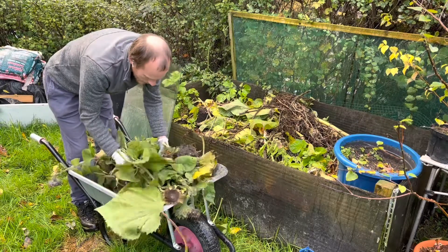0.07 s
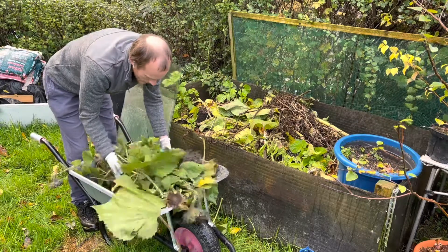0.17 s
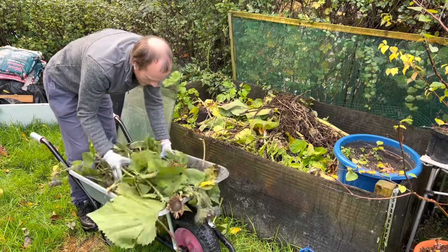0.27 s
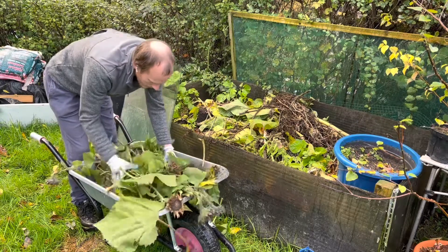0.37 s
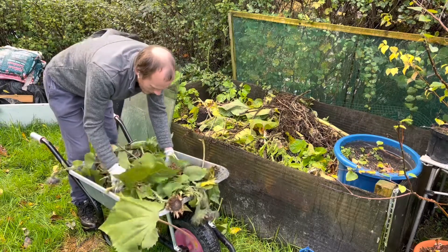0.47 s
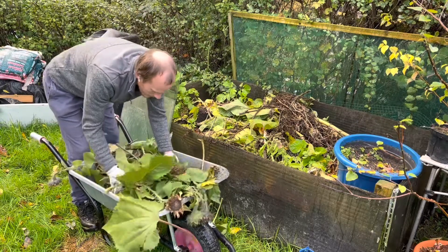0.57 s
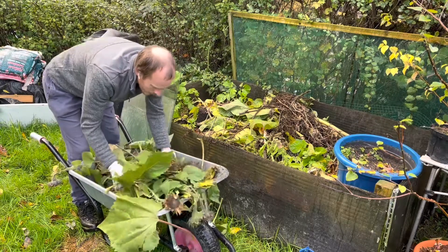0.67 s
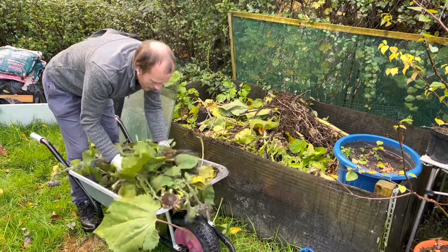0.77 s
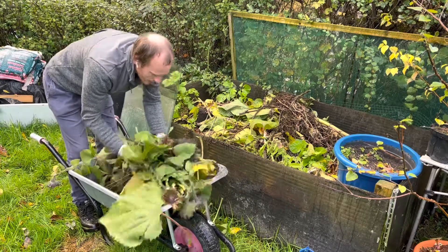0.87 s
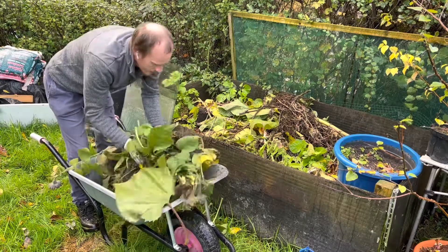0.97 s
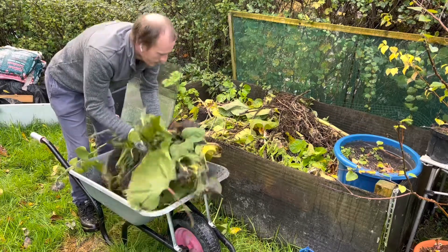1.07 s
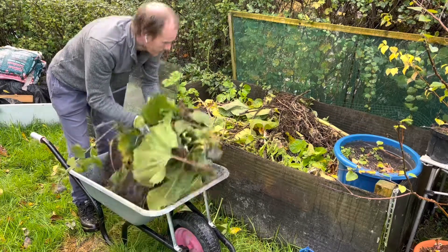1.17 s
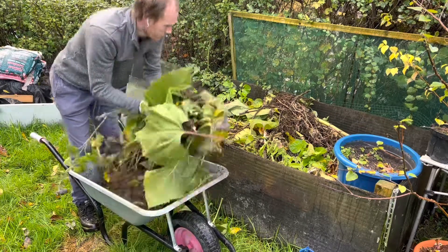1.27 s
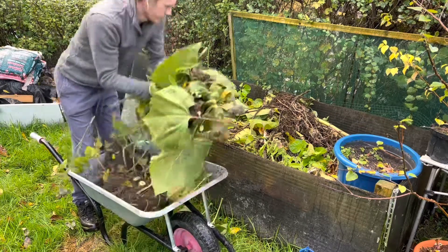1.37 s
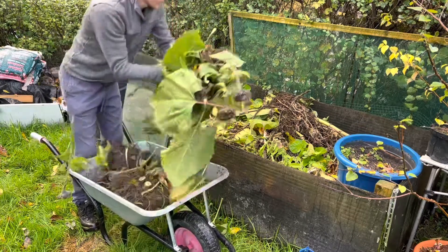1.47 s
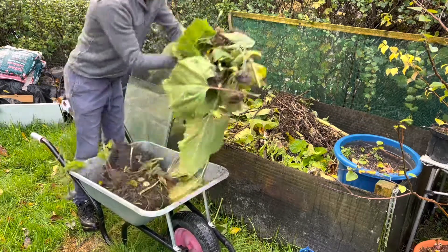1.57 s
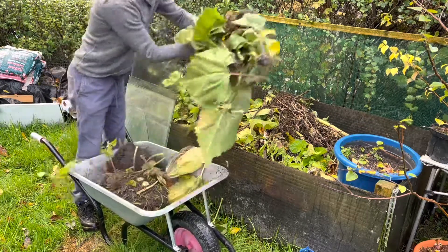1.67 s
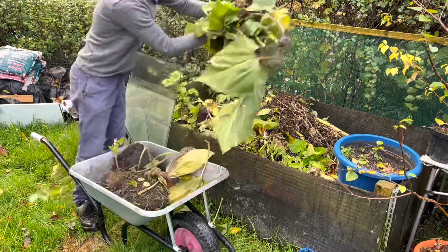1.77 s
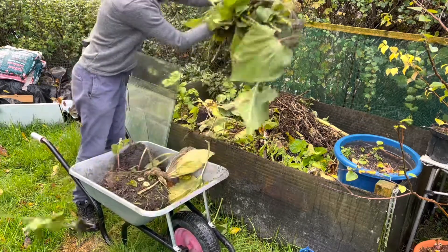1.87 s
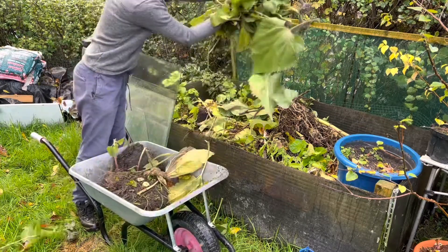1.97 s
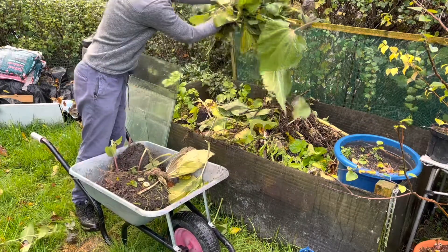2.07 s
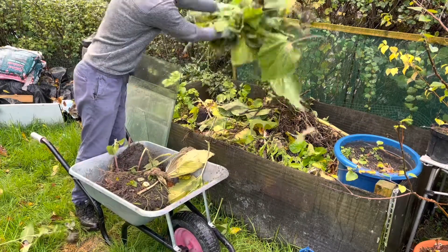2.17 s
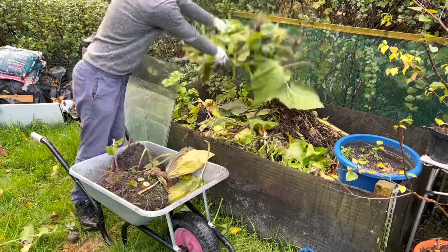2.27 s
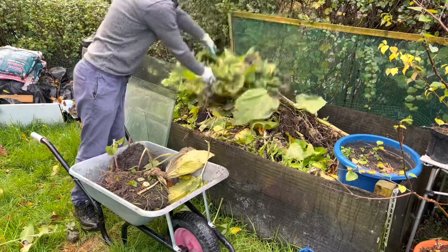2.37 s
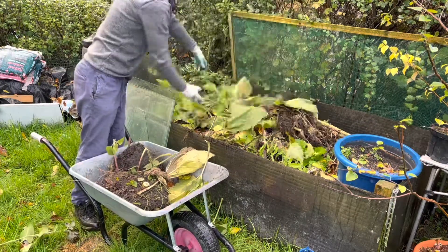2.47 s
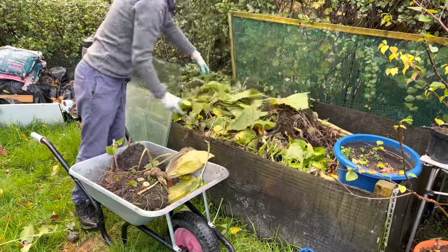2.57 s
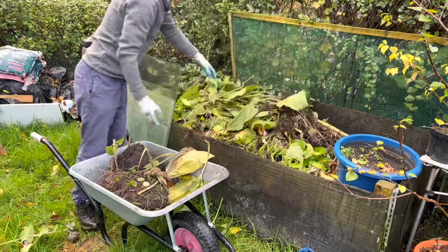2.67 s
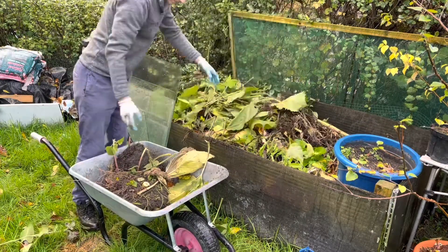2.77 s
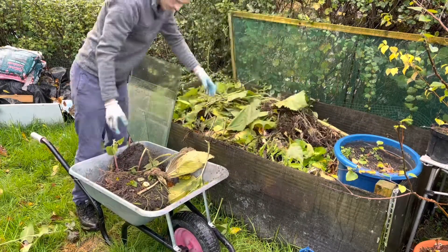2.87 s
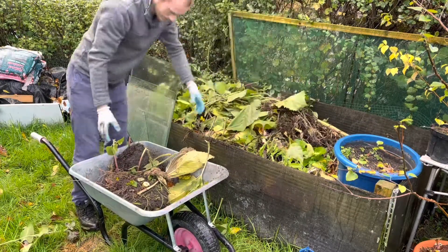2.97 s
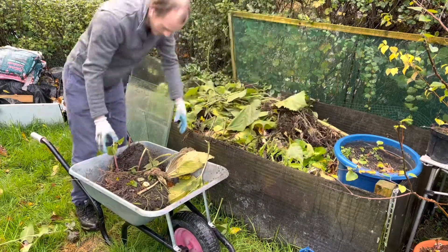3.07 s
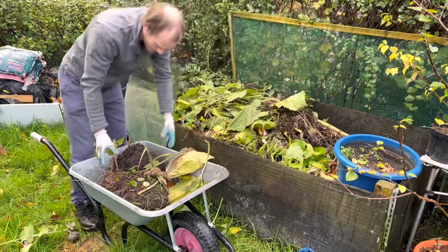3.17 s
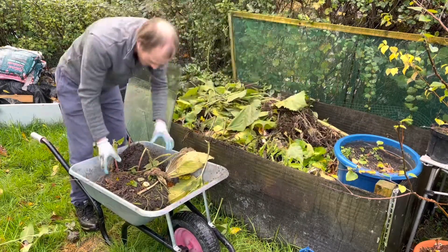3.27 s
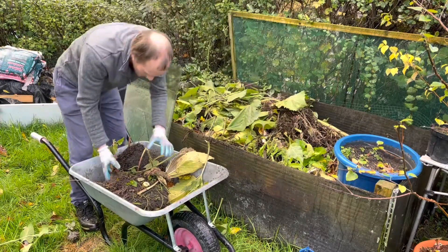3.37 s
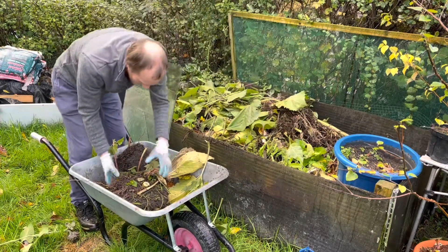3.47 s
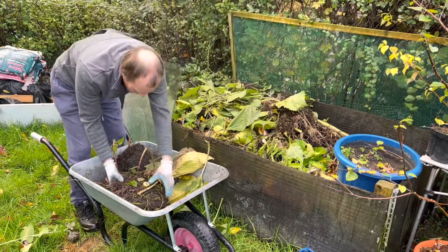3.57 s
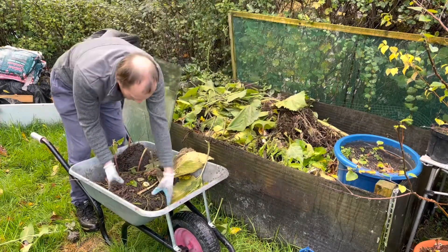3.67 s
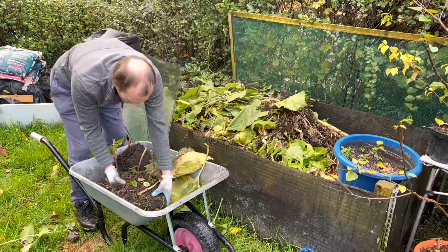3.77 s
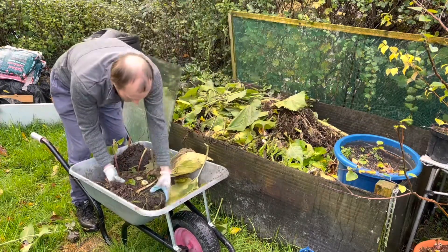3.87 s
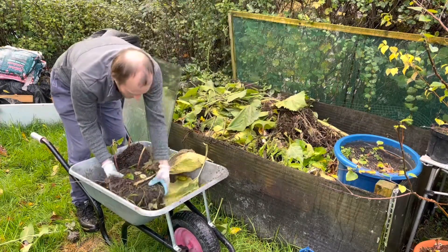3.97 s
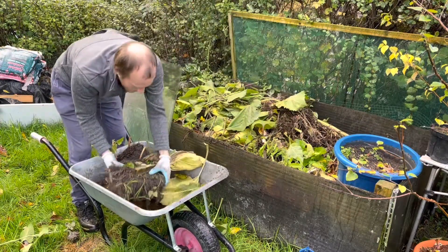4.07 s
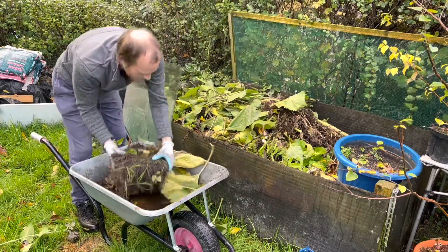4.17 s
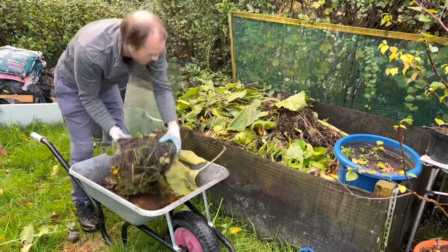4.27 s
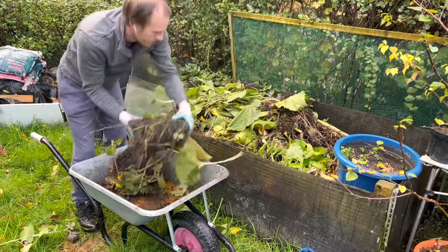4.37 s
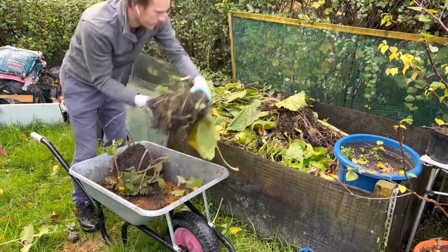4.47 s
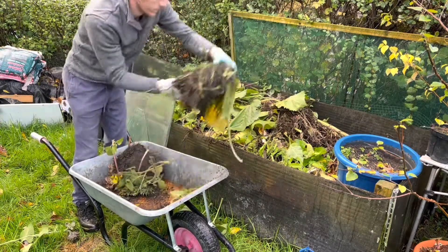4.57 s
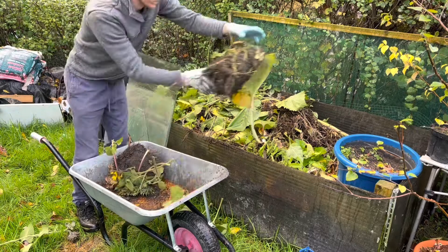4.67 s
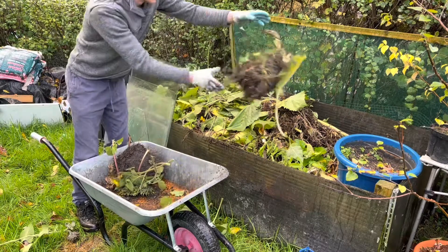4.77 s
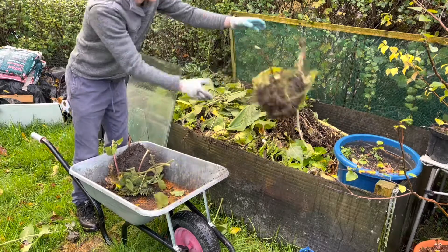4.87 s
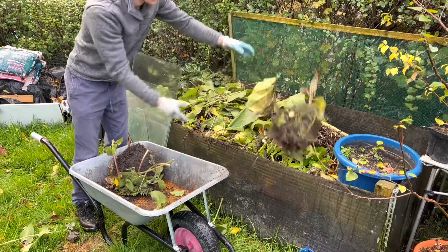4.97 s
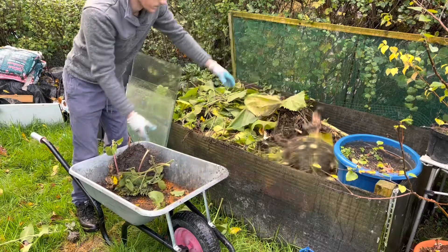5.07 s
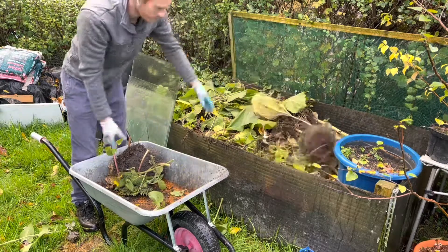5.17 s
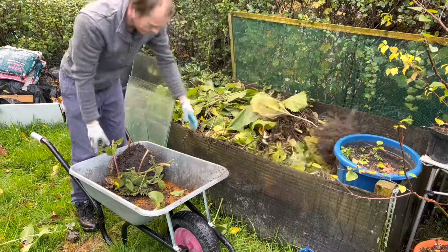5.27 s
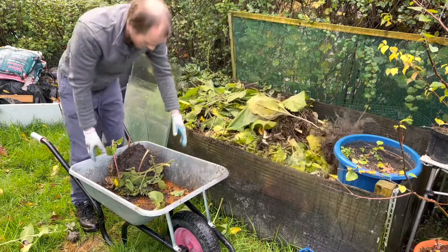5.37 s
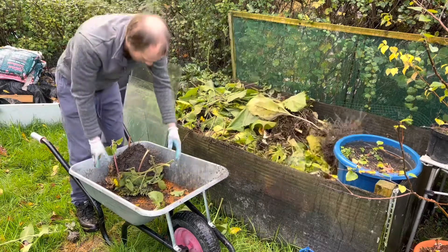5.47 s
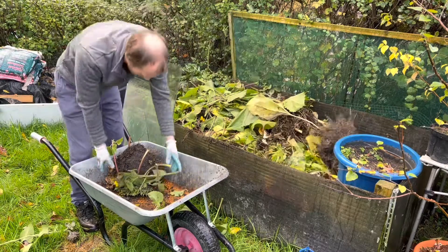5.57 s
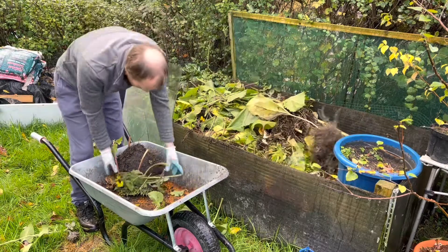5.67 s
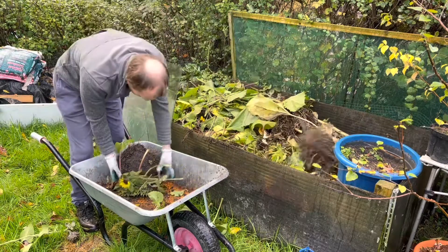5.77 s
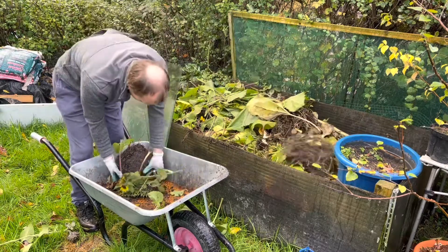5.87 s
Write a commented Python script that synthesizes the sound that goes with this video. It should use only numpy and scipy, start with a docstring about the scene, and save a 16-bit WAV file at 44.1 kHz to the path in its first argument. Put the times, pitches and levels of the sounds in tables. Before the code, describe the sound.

In a quiet garden, gloved hands gather big leaves from a metal wheelbarrow with a crinkling rustle and snapping stems. A clod drops back with a loud crunch and briefly rings the tray. The leaves land rustling on a compost heap and a small bird chirps once, faintly. Then soil and dry roots are scraped up and thrown, crackling more softly among dull thuds. Everything is heard from straight ahead.

```python
"""In a quiet garden, gloved hands gather an armful of big leaves from a metal wheelbarrow.
A clod drops back and rings the tray. The leaves are tossed on a compost heap, a small bird chirps,
then soil and roots are scooped up and thrown after them. The rustle is a shower of tiny slips and
breaks; single stems snap and lumps of earth thud."""
import sys
import numpy as np
from scipy import signal
from scipy.fft import rfft, irfft, next_fast_len
from scipy.io import wavfile

SR = 44100
rng = np.random.default_rng(int(sys.argv[2]) if len(sys.argv) > 2 else 0)


def unload_audio(sound):
    """Save the sound as a 16-bit wav file, at the path given as the first command line argument."""
    columns = np.transpose(np.atleast_2d(sound))
    # keep every value between -1 and 1, then stretch to whole-number steps
    steps = np.round(np.clip(columns, -1, 1) * 32767)
    wavfile.write(sys.argv[1], SR, steps.astype(np.int16))


N = 261513

# earth landing in the tray (time [s], level [dB], time to fade by 60 dB [s])
CLOD_HITS = [(1.443, -21.5, 0.21), (1.449, -9, 0.11), (1.466, -11.5, 0.15), (1.524, -21, 0.16),
             (1.565, -35, 0.34)]


def undb(db):
    """Turn decibels into a number to multiply by."""
    return 10 ** (np.asarray(db) / 20)


def unit(x):
    """Scale a sound to an average strength (rms) of 1."""
    return x / np.sqrt(np.mean(x ** 2))


def add(out, s, sound):
    """Mix a sound in, starting at s seconds."""
    i = int(s * SR)
    out[i:i + len(sound)] += sound[:N - i]


def band(x, lo_hz, hi_hz, order=2):
    """Keep the pitches between two edges; a higher order cuts more sharply."""
    edges = [lo_hz, min(hi_hz, SR / 2 - SR / 20)]
    return signal.sosfilt(signal.butter(order, edges, "band", fs=SR, output="sos"), x)


def colour(x, points, size=4096):
    """Shape the tone of a sound to follow a curve of (pitch [Hz], level [dB]) points."""
    hz, db = np.transpose(points)
    log_gain = np.log(undb(np.interp(np.log(np.fft.rfftfreq(size, 1 / SR) + 1), np.log(hz), db)))
    cepstrum = irfft(log_gain)[:size // 2]
    cepstrum[1:] *= 2  # makes the filter ring after a click, never before it
    return signal.fftconvolve(x, irfft(np.exp(rfft(cepstrum, size))))[:len(x)]


def wander(rate, size=N):
    """A random drift of about 1 up or down, turning rate times a second."""
    knots = rng.standard_normal(size // 50)
    return np.sqrt(3 / 2) * np.interp(np.arange(size) / SR * rate, np.arange(len(knots)), knots)


def slips(per_s, spread_db, grit_s):
    """A shower of tiny clicks, most weak and a few strong, each trailing a moment of rubbing noise."""
    strength = undb(spread_db * np.minimum(rng.exponential(size=N), 4.5))
    clicks = (rng.random(N) < per_s / SR) * strength * rng.choice([-1, 1], N)
    energy = signal.lfilter([1], [1, -np.exp(-1 / (grit_s * SR))], clicks ** 2)
    return unit(clicks) + .8 * unit(np.sqrt(energy) * rng.standard_normal(N))


def shifting(x, rate, patchy_db):
    """Ever different leaves and crumbs are in play, so each half octave swells and fades by itself."""
    size = next_fast_len(N)
    spectrum = rfft(x, size)
    half_octave = 2 * np.log2(np.fft.rfftfreq(size, 1 / SR).clip(256, 11585))
    bands = (irfft(spectrum * np.maximum(1 - abs(half_octave - k), 0), size)[:N] for k in range(16, 28))
    return sum(part * undb(patchy_db * wander(rate)) for part in bands)


def cracks(per_s, spread_db, cycles):
    """Veins and twigs break one by one, each with a brief ping at a pitch of its own."""
    out, t = np.zeros(N), np.arange(SR // 50) / SR
    for when, pitch, size, phase in rng.random((int(per_s * N / SR), 4)):
        hz = 1200 * 2 ** (2.9 * pitch)
        ping = np.sin(2 * np.pi * (hz * t + phase)) * np.exp(-t * hz / cycles) * np.sqrt(hz)
        strength = undb(spread_db * min(-np.log(1 - size), 3.5))
        add(out, when * N / SR, strength * ping)
    return unit(out)


def crinkle(per_s, spread_db, crack_db, bunch_db, patchy_db):
    """Plants rub against each other: slips and cracks that come in quick bunches."""
    rubbing = shifting(unit(slips(per_s, spread_db, grit_s=0.0036)), rate=45, patchy_db=patchy_db)
    breaks = undb(crack_db) * cracks(per_s=300, spread_db=1.5, cycles=32)
    return undb(bunch_db * wander(120)) * (rubbing + breaks)


def rustle(strokes, plants, earth):
    """Each hand stroke swells, holds and dies away: plants crinkle while crumbs tumble beneath them."""
    t = np.arange(N) / SR
    power = np.zeros((4, N))
    for s, rise, hold, fade, db, body_db, fizz_db, earth_db in strokes:
        # the fall steepens as the last leaves come to rest
        fall_db = -60 * np.clip((t - s - rise - hold) / fade, 0, 2) ** 1.258
        effort = np.clip((t - s) / rise, 0, 1) * undb(fall_db)
        gains = undb(db + np.array([body_db, 0, fizz_db, earth_db]))
        power += np.outer(gains ** 2, effort ** 2)
    body = unit(band(plants, 400, 1160, order=4))  # broad blades
    crackle = unit(band(plants, 1100, 3474, order=5))  # stems
    fizz = unit(band(plants, 3474, 11000, order=5))  # dry edges and grit
    return np.sum(np.sqrt(power) * [body, crackle, fizz, earth], axis=0)


def green_leaves(earth):
    """Big leaves rub and crack as they are gripped, lifted, carried and dropped."""
    # hand strokes (start [s], rise [s], hold [s], fade [s], crackle level [dB],
    # body [dB], fizz [dB], earth [dB]); the last three count from the crackle level
    strokes = [(-0.01, 0.0093, 0.34, 0.57, -38, -4, -1.5, -10),
               (0.39, 0.029, .19, 0.42, -36, -5.5, 0.5, -13),
               (0.56, 0.18, 0.22, 0.43, -32, -4.5, -0.5, -13.5),
               (1.025, 0.077, 0.044, 0.49, -28, -8, -0.5, -19),
               (1.195, 0.016, 0.089, .18, -35.5, -1.5, -2, -0.5),
               (1.325, .055, 0.0092, 0.11, -39.5, 0, -1, 3),
               (1.66, 0.016, 0.097, 1.64, -65.5, -3.5, -1, -6.5),
               (2.10, 0.1005, 0.043, 0.18, -63.5, -5.5, -2, -12),
               (2.218, 0.031, 0.073, .25, -42, -19, -5, -33.5),
               (2.27, 0.047, 0.0078, 0.46, -37.5, -14, 0, -40.5),
               (2.413, 0.026, 0.088, 0.24, -36, -6.5, -1, -3.5),
               (2.39, 0.1, 0.032, 0.32, -28.5, -7, 0, -30),
               (2.625, 0.031, 0.0064, .07, -42.5, -6, 2.5, -12), (2.70, 0.021, .1, .8, -80, 1, -6, -3)]
    # tone of green leaves (pitch [Hz], relative level [dB])
    tone = [(180, -35.5), (300, -3), (412, 2.5), (458, -7), (701, -2), (1190, -8.5), (2080, -3), (3710, -4),
            (4650, -8), (5930, -5), (6590, -7.5), (9770, -17), (11200, -28), (14600, -64.5), (22000, -120)]
    leaves = crinkle(per_s=5500, spread_db=1.5, crack_db=-10.5, bunch_db=0.76, patchy_db=1.8)
    return rustle(strokes, colour(leaves, tone), earth)


def crumbs():
    """Tumbling earth: boxy in the loaded tray, looser and deeper once the clod has landed."""
    # tone of crumbs in the loaded tray (pitch [Hz], relative level [dB])
    tray_tone = [(30, -44.5), (110, -39), (190, -33.5), (250, -31.5), (310, 1), (400, -7.5), (480, -10),
                 (800, -57.5)]
    # tone of loose earth (pitch [Hz], relative level [dB])
    loose_tone = [(30, -30.5), (70, -21.5), (115, -20), (170, -8.5), (230, 2.5), (300, 0), (390, 0.5),
                  (480, -10), (800, -54)]
    tumble = slips(per_s=1100, spread_db=1.8, grit_s=0.0031)
    loaded = np.arange(N) / SR < CLOD_HITS[-1][0]
    return np.where(loaded, unit(colour(tumble, tray_tone)), unit(colour(tumble, loose_tone)))


def garden_air(level_db):
    """Faint outdoor air that swells a little."""
    # tone of still air (pitch [Hz], relative level [dB])
    tone = [(30, -28.5), (110, -12.5), (230, 0.5), (900, -2), (2500, -7), (6000, -9.5), (11000, -22)]
    return undb(level_db + wander(4.2)) * unit(colour(rng.standard_normal(N), tone))


def bursts(table, rise_s, fringe_db):
    """Quickly dying puffs of noise, each around its own pitch with a weaker, wider fringe."""
    out, t = np.zeros(N), np.arange(SR // 4) / SR
    for s, db, hz, octaves, fade_s in table:
        noise = rng.standard_normal(2 * len(t))
        edge = 2 ** (octaves / 2)
        fade = (1 - np.exp(-t / rise_s)) * 1000 ** (-t / fade_s)  # 60 dB down after fade_s
        core = unit(band(noise, hz / edge, hz * edge, order=3))
        fringe = unit(band(noise, hz / edge / 2, hz * edge * 2))
        puff = (core + undb(fringe_db) * fringe)[len(t):] * fade
        add(out, s, undb(db) * puff * np.linalg.norm(fade) / np.linalg.norm(puff))
    return out


def thuds():
    """Earth, hands and boots knock dully: heavy lumps last longer, broad scuffs die sooner."""
    # knocks (time [s], level [dB], pitch [Hz], width [octaves])
    knocks = [(0.25, -30, 348, 0.36), (1.268, -30, 397, 0.31), (1.505, -26.5, 340.5, 0.25),
              (2.975, -39, 337, 1.47), (3.474, -43.5, 380, 0.85), (3.81, -42.5, 227.4, 0.3),
              (3.91, -39, 188, 0.77), (4.213, -30, 271, 0.13), (4.524, -40.5, 260, 0.57),
              (4.59, -43, 260, .22), (4.84, -38.5, 250, 0.16), (5.276, -47.5, 236, 0.74),
              (5.407, -51, 345, 0.63), (5.726, -33, 209, 0.25), (5.867, -34, 199, 0.35)]
    with_fades = [(s, db, hz, octaves, 35 / (hz * (1 + octaves))) for s, db, hz, octaves in knocks]
    return bursts(with_fades, rise_s=.004, fringe_db=-26)


def snaps():
    """Stems snap, leaves and grit flick; they are too thin to give off bass."""
    # snaps and flicks (time [s], level [dB], pitch [Hz], width [octaves], fade [s])
    breaks = [(.7773, -8, 6450, 0.67, 0.0043), (1.0418, -25, 1900, 3, 0.15), (1.205, -22, 2210, 2.2, 0.036),
              (1.296, -27.5, 2000, 2.7, 0.037), (1.384, -32, 4500, 1.9, 0.075),
              (1.475, -49, 7400, 0.95, 0.24), (1.566, -39.5, 7700, 0.67, 0.14),
              (1.618, -32.5, 2730, 0.25, 0.073), (1.651, -23.5, 1670, 0.89, 0.054),
              (1.674, -41.5, 1336, 0.77, 0.11), (2.1358, -54.5, 974, 1.04, 0.047),
              (2.229, -42.5, 2020, 0.33, 0.13), (2.640, -33.5, 627, 1, 0.062),
              (2.642, -29, 2870, 0.65, 0.048), (2.6635, -27, 3160, 0.82, 0.059),
              (3.380, -54.5, 5860, 0.69, 0.035), (3.444, -55, 8960, 0.62, 0.022),
              (4.185, -34.5, 2400, 3.5, 0.055), (4.2117, -28, 1960, 2.9, 0.039),
              (4.569, -40, 2170, 3.44, 0.07), (4.6335, -39.5, 1370, 2.9, 0.094),
              (4.831, -37, 855, 1.6, 0.13), (4.8748, -29.5, 5700, 1.1, 0.08),
              (4.896, -31, 2700, 2.2, 0.048), (5.020, -24, 3110, 0.28, 0.051),
              (5.0892, -35, 2780, 1.8, .015), (5.1018, -27, 3660, 0.57, 0.02),
              (5.287, -43.5, 1870, 1.9, .05), (5.372, -52, 1860, 1.2, 0.083),
              (5.430, -56.5, 1840, 0.7, .06), (5.624, -47, 750, 0.4, 0.1), (5.781, -33.5, 2800, 1.7, 0.063)]
    return band(bursts(breaks, rise_s=.0003, fringe_db=-16) + 1e-18, 200, 17000)


def clod():
    """A clod breaks up on the tray in a few quick crunches."""
    # tone of a crunch (pitch [Hz], relative level [dB])
    tone = [(40, -50), (170, -42.5), (250, -26.5), (340, 3), (600, 3.5), (950, 6.5), (1400, -1.5),
            (2000, -2.5), (2800, -4.5), (3900, -14), (5300, -22), (9000, -34), (11000, -44.5)]
    out, t = np.zeros(N), np.arange(SR // 2) / SR
    for s, db, fade_s in CLOD_HITS:
        crunch = unit(colour(rng.standard_normal(len(t)), tone))
        add(out, s, undb(db) * crunch * (1 - np.exp(-t / 0.002187)) * 1000 ** (-t / fade_s))
    return out


def tray_ring(s, boost_db, fade_s, smother_s, waver_db):
    """The struck steel rings, high notes dying first, until the settling soil smothers it."""
    # the steel tray's own notes (pitch [Hz], relative level [dB])
    notes = [(349.9, -41.5), (430.7, -52), (495.3, -38.5), (581.4, -29.5), (699.8, -45.5), (732.1, -46.5),
             (769.8, -41), (834.4, -36), (899.0, -38.5), (931.3, -37), (1055, -47), (1098, -38),
             (1200, -52.5), (1276, -55), (1384, -58.5), (1486, -49), (1599, -48.5), (1787, -55),
             (1836, -62), (1927, -54)]
    out, t = np.zeros(N), np.arange(SR // 2) / SR
    held = (1 - np.exp(-t / 0.0044)) * np.exp(-(t / smother_s) ** 10)
    for hz, db in notes:
        waver = waver_db * wander(40, size=len(t))  # loose earth rolls on the sheet
        fade = 1000 ** (-t / (fade_s * min(1, 1000 / hz)))
        note = np.sin(2 * np.pi * (hz * t + rng.random()))
        add(out, s, undb(db + boost_db + waver) * held * fade * note)
    return out


def bird():
    """A small bird in the hedge gives one thin chirp, a narrow puff of high noise."""
    # the call (time [s], level [dB], pitch [Hz], width [octaves], fade [s])
    chirp = [(3.406, -55.5, 7250, 0.2, 0.31)]
    return bursts(chirp, rise_s=0.0022, fringe_db=-33.5)


def dry_roots(earth):
    """Gloves scrape up soil and crackling roots, and the clump rolls down the heap."""
    # scrapes and rolls (start [s], rise [s], hold [s], fade [s], crackle level [dB],
    # body [dB], fizz [dB], earth [dB]); the last three count from the crackle level
    strokes = [(3.465, 0.0087, 0.028, 0.29, -73.5, -1, -12, 5),
               (3.537, 0.02, 0.074, .22, -58, -8.5, -1, -11.5),
               (3.688, 0.0047, 0.015, 0.61, -47, -1, -4, -11), (3.71, 0.038, .015, 0.21, -46, -11, 3, -6.5),
               (3.815, 0.028, 0.018, 0.18, -48.5, -8, 0.5, -6),
               (3.88, 0.23, .08, 0.22, -48, -3, -1.5, -4.5),
               (4.205, 0.0033, 0.016, 0.27, -39.5, -2.5, -4.5, -15),
               (4.24, 0.073, 0.021, 0.2, -40, -11.5, -3, -16), (4.37, 0.027, .005, 0.23, -47, -4, -2, -2.5),
               (4.47, 0.042, 0.022, 0.26, -52.5, -2, -4.5, -3.5),
               (4.562, 0.012, .025, 0.31, -47, -2.5, -2.5, -3),
               (4.62, 0.03, 0.019, 0.78, -43.5, -4.5, -7, -13),
               (4.825, 0.019, 0.056, 0.26, -44, 1, -13, -5.5),
               (4.93, 0.053, 0.0083, 0.15, -45, -3, -3, -5.5), (5.0, 0.08, 0.022, 0.37, -39, -5.5, 0, -9),
               (5.22, 0.029, .16, 0.13, -64, -6, -12.5, -13),
               (5.42, .05, 0.12, 0.32, -78, -2.5, -0.5, -3.5),
               (5.545, 0.058, .01, .2, -54.5, -17, -3.5, -25),
               (5.605, 0.044, .025, 0.31, -46, -11.5, -1, -32),
               (5.71, 0.069, 0.095, .3, -40, -9.5, 0.5, -11)]
    # tone of dry roots (pitch [Hz], relative level [dB])
    tone = [(240, -26), (400, -6.5), (478, -3.5), (526, -0.5), (571, -2.5), (803, -2), (1060, -6.5),
            (1150, -6.5), (1850, 1.5), (3770, -0.5), (4820, -3), (5750, 3.5), (7460, -2.5), (10500, -13.5),
            (13600, -61), (22000, -120)]
    roots = crinkle(per_s=4000, spread_db=2.0, crack_db=-8.5, bunch_db=1.7, patchy_db=2.0)
    return rustle(strokes, colour(roots, tone), earth)


def garden_echo(x, fade_s, echo_db):
    """Fence, ground and bushes scatter the sound, adding a faint blurred tail."""
    t = np.arange(SR // 2) / SR
    tail = rng.standard_normal(len(t)) * 1000 ** (-t / fade_s)
    return x + undb(echo_db) * signal.fftconvolve(x, tail / np.linalg.norm(tail))[:N]


def scene():
    """All the work happens straight ahead, so both ears hear the same."""
    earth = crumbs()
    ring = tray_ring(s=1.449, boost_db=13, fade_s=.48, smother_s=.23, waver_db=1.2)
    tray = band(clod() + ring + 1e-18, 160, 18000, order=1)  # thin steel gives off little bass
    direct = green_leaves(earth) + thuds() + snaps() + tray + bird() + dry_roots(earth)
    sound = garden_echo(direct, fade_s=0.79, echo_db=-34) + garden_air(level_db=-83)
    return np.array([sound, sound])


def record(dry):
    """The small microphone thins the deep bass, and the highest treble is cut off steeply."""
    bass_hz, top_hz = 60, 11200
    thinned = signal.sosfilt(signal.butter(1, bass_hz, "high", fs=SR, output="sos"), dry)
    return signal.sosfilt(signal.ellip(10, .2, 80, top_hz, fs=SR, output="sos"), thinned)


dry = scene()
out = record(dry)
unload_audio(out)
```